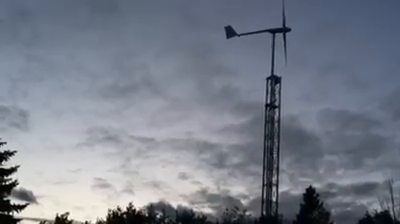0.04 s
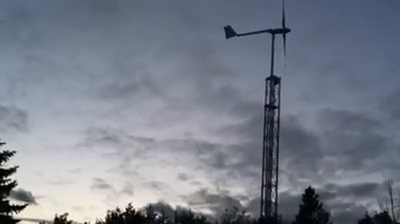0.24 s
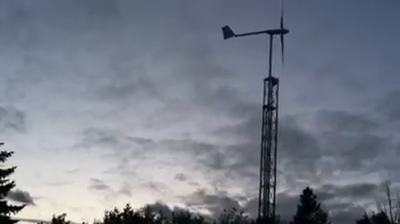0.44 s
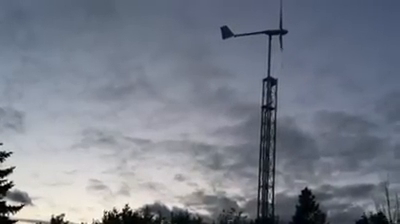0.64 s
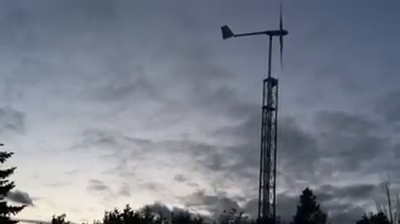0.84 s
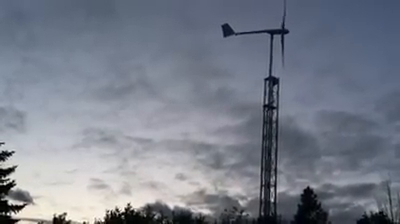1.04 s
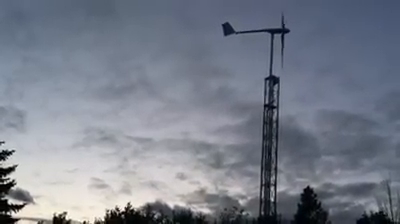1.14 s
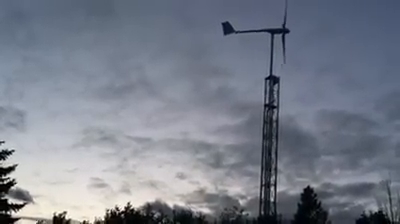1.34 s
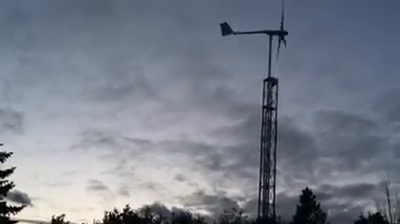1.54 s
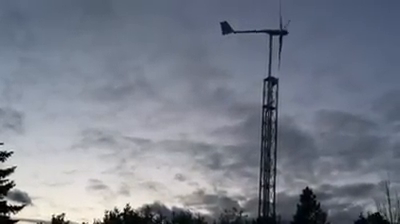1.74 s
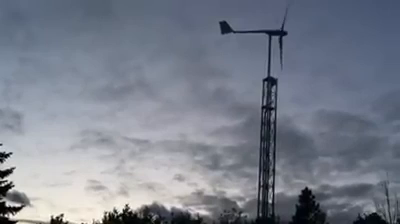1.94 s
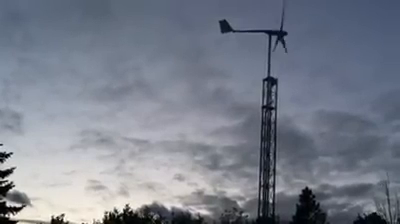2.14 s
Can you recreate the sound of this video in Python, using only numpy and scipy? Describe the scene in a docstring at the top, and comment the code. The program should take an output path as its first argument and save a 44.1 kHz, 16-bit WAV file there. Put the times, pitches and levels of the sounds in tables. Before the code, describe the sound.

Light wind blows outdoors, brushing the microphone with a low flutter and dull bumps. The gusts die down, and a soft hollow rush swells once, with a small wind turbine droning very faintly underneath.

```python
"""Light wind at a small turbine.

A soft rush with a hollow band near 900 Hz swells once, over a low murmur of air and a steady hiss.
The slowly turning turbine adds a faint drone and whine.
Gusts brush the microphone: a low flutter, with single eddies that land as dull bumps."""
import sys
import numpy as np
from scipy import signal
from scipy.fft import rfft, irfft
from scipy.io import wavfile

SR = 44100
rng = np.random.default_rng(int(sys.argv[2]) if len(sys.argv) > 2 else 0)


def master(y):
    """Save y as 16-bit WAV."""
    cut = np.clip(np.atleast_2d(y).T, -1, 1)
    pcm = np.round(cut * 32767)  # scale
    wavfile.write(sys.argv[1], SR, pcm.astype(np.int16))


N = 97020
TIME_S = np.arange(N) / SR


def from_db(db):
    """Decibels to gain."""
    return 10 ** (np.asarray(db) / 20)


def unit_rms(x):
    """Scale to unit rms."""
    return x / np.sqrt(np.mean(x ** 2) + 1e-20)


def curves(rows):
    """Each column after time, interpolated to every sample."""
    times_s, *columns = np.transpose(rows)
    return [np.interp(TIME_S, times_s, column) for column in columns]


def drift(rate_hz):
    """Random wander, rolled off above rate_hz; unit rms."""
    hz = np.arange(N // 2 + 1) * SR / N
    white = rfft(rng.standard_normal(N))
    return unit_rms(irfft(white / (1 + (hz / rate_hz) ** 2), N))


def coloured_noise(spectrum):
    """Noise with the given spectral shape; unit rms."""
    hz, db = np.transpose(spectrum)
    bins_hz = np.arange(1, N // 2 + 2) * SR / N
    gain = from_db(np.interp(np.log(bins_hz), np.log(hz), db))
    return unit_rms(irfft(rfft(rng.standard_normal(N)) * gain, N))


def narrow_noise(centre_hz, width_hz):
    """Noise band around a steady or moving centre; unit rms."""
    phase = 2 * np.pi * np.cumsum(centre_hz * np.ones(N)) / SR
    return unit_rms(drift(width_hz / 2) * np.cos(phase) + drift(width_hz / 2) * np.sin(phase))


def zero_phase(x, hz, kind, order):
    """Butterworth high- or low-pass, run forward and back."""
    return signal.sosfiltfilt(signal.butter(order, hz, kind, fs=SR, output="sos"), x + 1e-18)


# Hiss spectrum (frequency [Hz], relative density [dB])
HISS_SPECTRUM = [(1000, -3.5), (2800, -3.5), (3400, -3.5), (4300, -1), (6000, -3.5), (7500, -7),
                 (9500, -7.5), (11500, -17), (15500, -44)]

def hiss(level_db=-73.5):
    """Steady self-noise of the microphone."""
    return from_db(level_db) * coloured_noise(HISS_SPECTRUM)


# Murmur spectrum (frequency [Hz], relative density [dB])
MURMUR_SPECTRUM = [(25, -16), (50, -38), (90, -15.5), (130, -4.5), (190, 1), (260, -1), (350, -7),
                   (500, -20), (1000, -36.5)]

def murmur(level_db=-71, swing_share=0.62):
    """Low outdoor air, rising and falling with the wind's rush."""
    rush_db, = curves(RUSH_LEVEL)
    swing_db = swing_share * (rush_db - rush_db.mean())
    return from_db(level_db + swing_db) * coloured_noise(MURMUR_SPECTRUM)


def turbine(drone_db=-76, whine_db=-74.5):
    """Faint wavering drone and thin whine, probably from the rotor."""
    drone = from_db(drone_db) * narrow_noise(centre_hz=241.6, width_hz=8.7)
    whine = from_db(whine_db) * narrow_noise(centre_hz=880, width_hz=25)
    return drone + whine


# Rush envelope (time [s], level [dB])
RUSH_LEVEL = [(0, -67.5), (.2, -66.5), (.45, -67.5), (.7, -70), (.92, -66.5), (1.15, -68.5), (1.45, -64.5),
              (1.65, -66.5), (1.9, -65.5), (2.2, -66)]
# Rush spectrum (frequency [Hz], relative density [dB])
RUSH_SPECTRUM = [(100, -36), (300, -0.5), (480, -0.5), (620, 1.5), (800, 2), (1050, 1.5), (1400, -2.5),
                 (1900, -6.5), (2500, -16), (4000, -45)]

def wind_rush(waver_db=0.91, waver_hz=4):
    """Broad, slightly wavering rush of distant wind."""
    level_db, = curves(RUSH_LEVEL)
    return from_db(level_db + waver_db * drift(waver_hz)) * coloured_noise(RUSH_SPECTRUM)


# Hollow band track (time [s], level [dB], centre [Hz])
HOLLOW_TRACK = [(0, -70, 987), (.2, -66, 900), (.45, -82.5, 880), (.62, -72.5, 883.7), (1.1, -72, 895),
                (1.4, -69.5, 870.6), (1.55, -69, 858.3), (1.65, -60.5, 871), (1.8, -66, 831),
                (1.86, -71.5, 1010), (2.0, -75.5, 950), (2.2, -72.5, 920)]

def hollow_band():
    """Hollow note in the rush; its pitch sinks a little as it swells."""
    level_db, centre_hz = curves(HOLLOW_TRACK)
    return from_db(level_db) * narrow_noise(centre_hz, width_hz=250)


# Gust envelope at the microphone (time [s], level [dB])
GUST_LEVEL = [(0, -67.5), (.05, -50), (.11, -67.5), (.19, -62), (.24, -38.5), (.29, -59.5), (.35, -53),
              (.40, -69), (.58, -66), (.62, -59), (.68, -78.5), (.79, -51.5), (.92, -50), (.98, -56),
              (1.07, -52), (1.2, -66), (1.26, -74), (2.2, -82)]
# Flutter spectrum (frequency [Hz], relative density [dB])
FLUTTER_SPECTRUM = [(30, -39.5), (60, -18.5), (90, -5), (135, -0.5), (190, -3), (280, -11.5), (400, -23),
                    (600, -31), (1200, -88)]

def flutter(jitter_db=0.5, jitter_hz=54):
    """Small-scale turbulence on the microphone, as strong as the gust."""
    gust_db, = curves(GUST_LEVEL)
    return from_db(gust_db - jitter_db * drift(jitter_hz)) * coloured_noise(FLUTTER_SPECTRUM)


# Eddy impacts (time [s], peak before band-limiting [dB], Gaussian half-width [ms])
EDDY_HITS = [(0.042, -36, 1.4), (0.0484, -41, 1.9), (0.079, -35, 1.2), (0.2255, -35, 1.1),
             (.236, -23.5, 0.44), (.239, -16.5, 0.71), (.246, -26.5, 1.8), (.284, -32.5, 0.67),
             (0.3243, -35, 0.69), (0.619, -49, 2.4), (0.74, -47.5, 1.6), (0.758, -45.5, 1.5),
             (0.8077, -37, 0.62), (0.8539, -28, 0.63), (.883, -36.5, 2.2), (.944, -38, 1.6),
             (1.027, -38, 0.46), (1.042, -63, 3), (1.061, -39, 1.1), (1.134, -45.5, 1.4),
             (1.1715, -39.5, 1.9), (1.2035, -41.5, 2), (1.369, -46, 2.4)]

def eddies(mic_cut_hz=165, mic_q=1.84, rasp_relative_db=-32):
    """Brief pressure dips ring the microphone's resonant low cut; a faint rasp rides on each bump."""
    omega = 2 * np.pi * mic_cut_hz
    b, a = signal.bilinear([1, 0, 0], [1, omega / mic_q, omega * omega], SR)
    bumps = np.zeros(N)
    for time_s, peak_db, half_width_ms in EDDY_HITS:
        offset_ms = (TIME_S - time_s) * 1000
        pressure = 1e-18 - np.exp(-0.5 * (offset_ms / half_width_ms) ** 2)
        bump = signal.lfilter(b, a, pressure)
        bumps += from_db(peak_db) * bump / np.abs(bump).max()
    bumps = zero_phase(bumps, hz=93.5, kind="high", order=2)
    bumps = zero_phase(bumps, hz=467, kind="low", order=5)
    envelope = np.abs(signal.hilbert(bumps))
    rasp = from_db(rasp_relative_db) * envelope * narrow_noise(centre_hz=689, width_hz=310)
    return bumps + rasp


def scene():
    """Mono sum at the microphone."""
    return (eddies() + flutter() + wind_rush() + hollow_band() + turbine() + murmur() + hiss())[None]


def record(dry):
    """Steep elliptic low-pass."""
    cutoff_hz = 15700
    return signal.sosfilt(signal.ellip(10, 0.1, 70, cutoff_hz, fs=SR, output="sos"), dry)


dry = scene()
out = record(dry)
master(out)
```